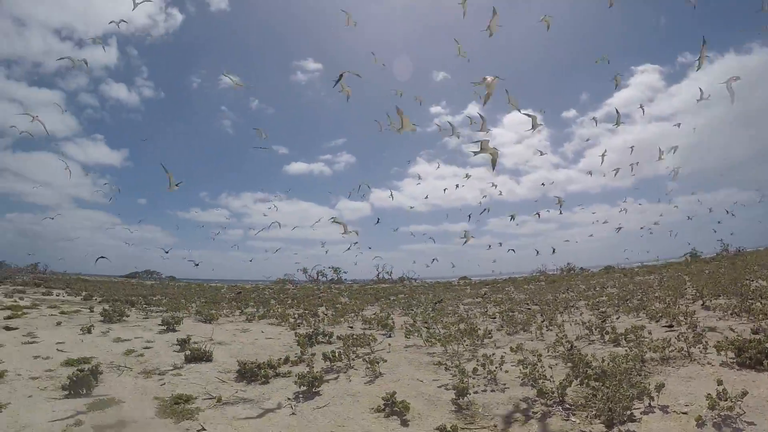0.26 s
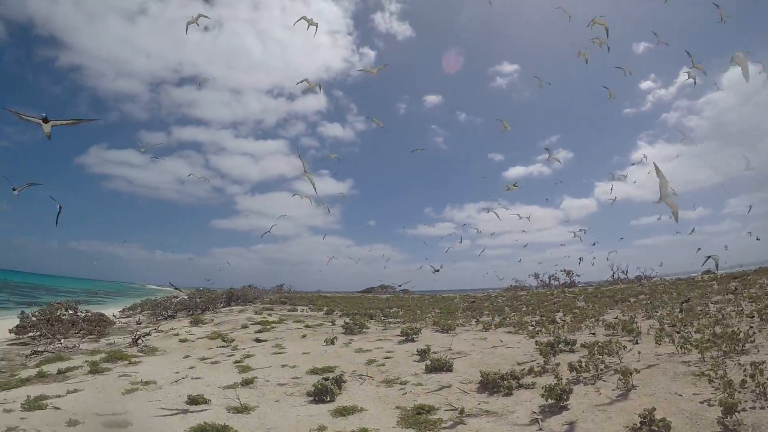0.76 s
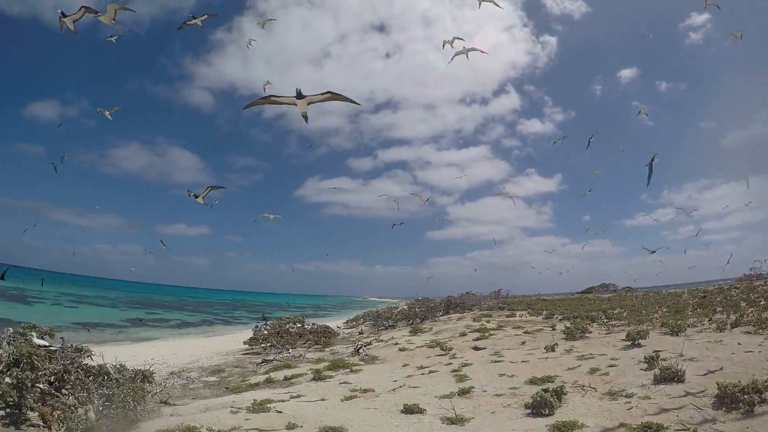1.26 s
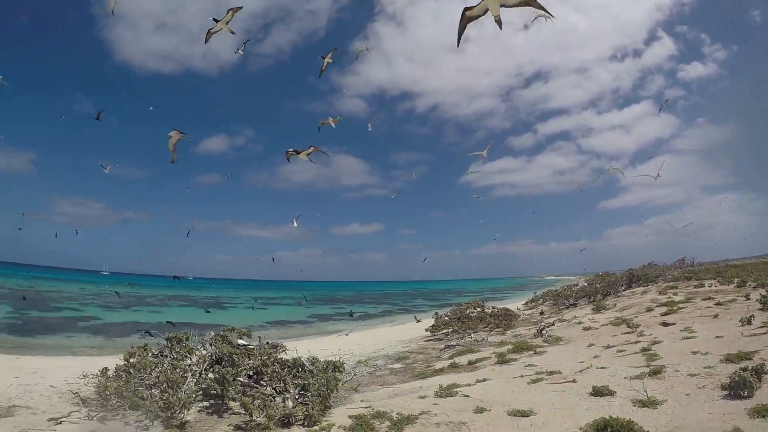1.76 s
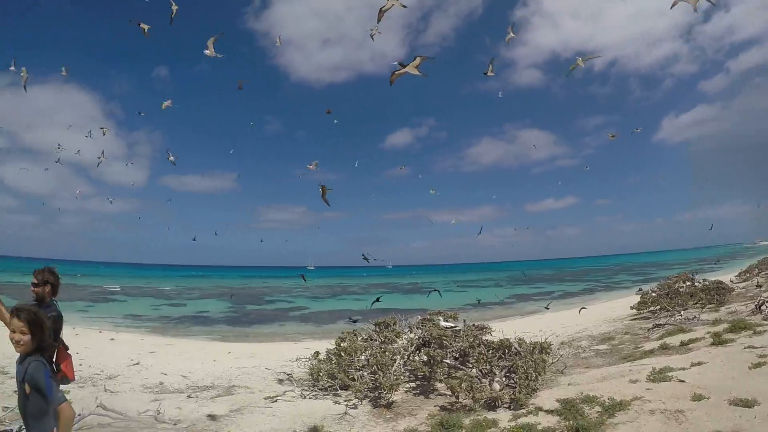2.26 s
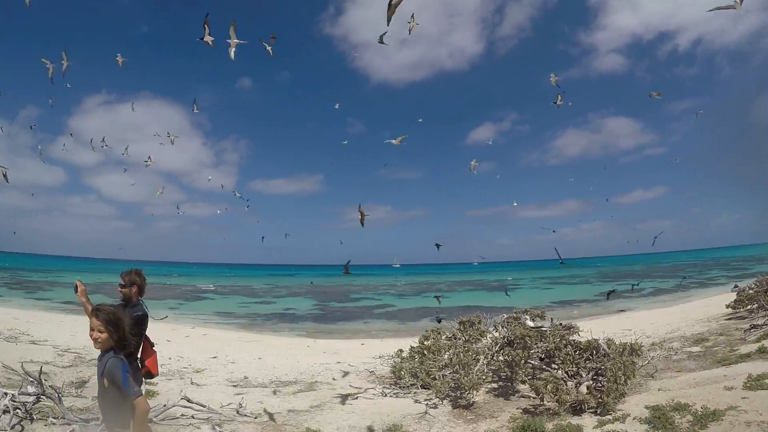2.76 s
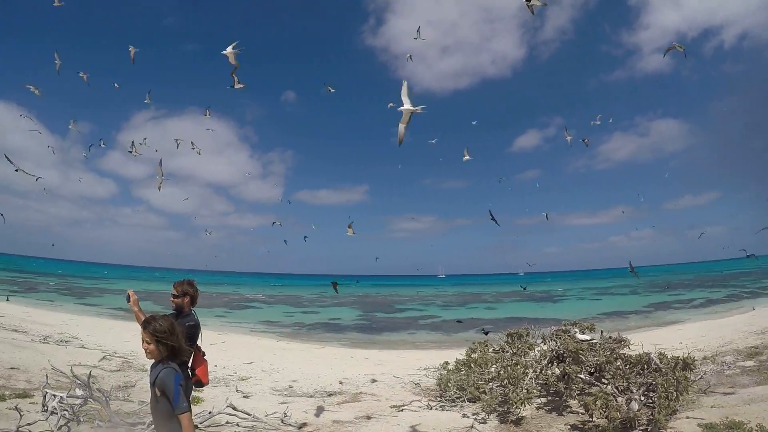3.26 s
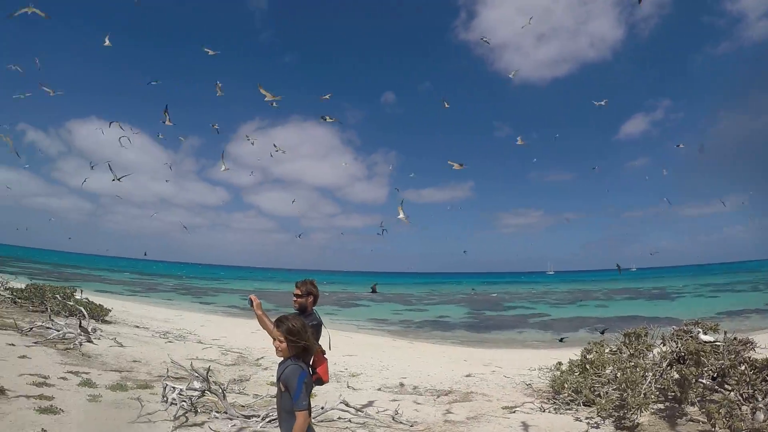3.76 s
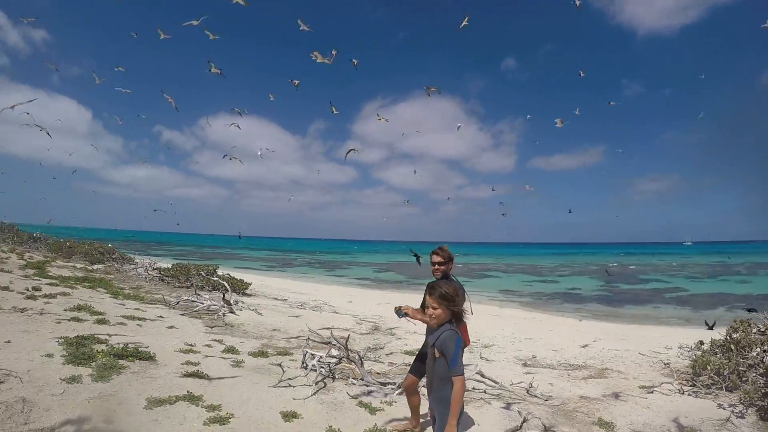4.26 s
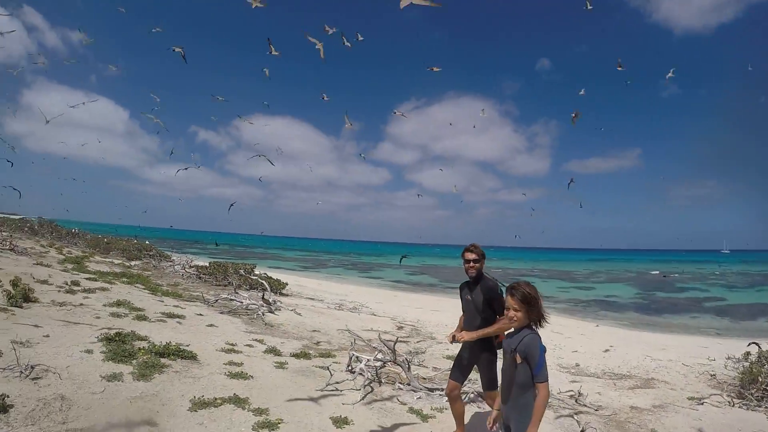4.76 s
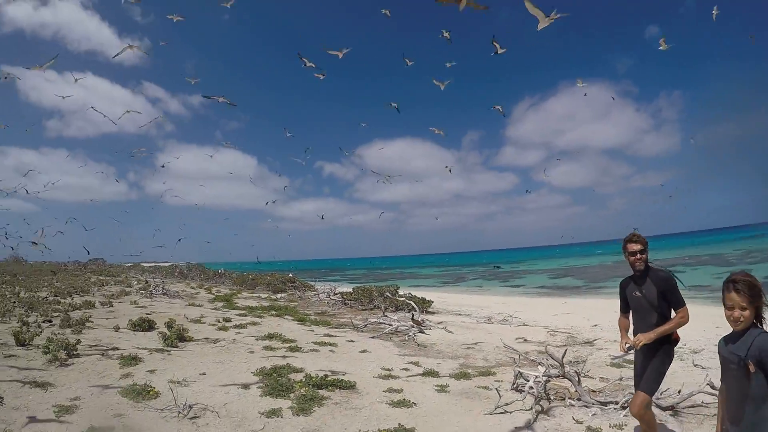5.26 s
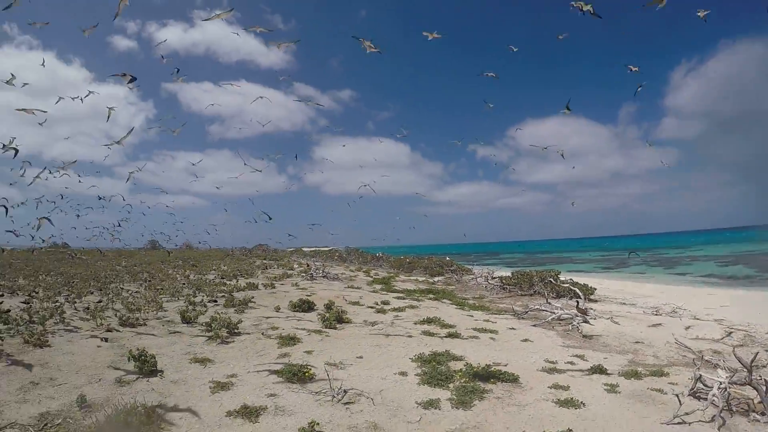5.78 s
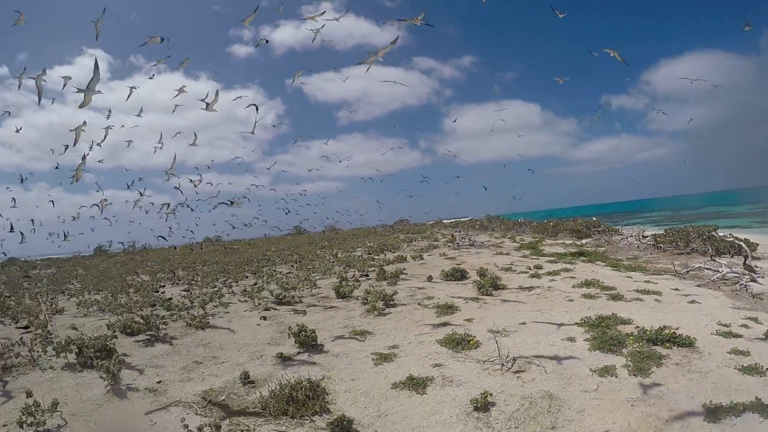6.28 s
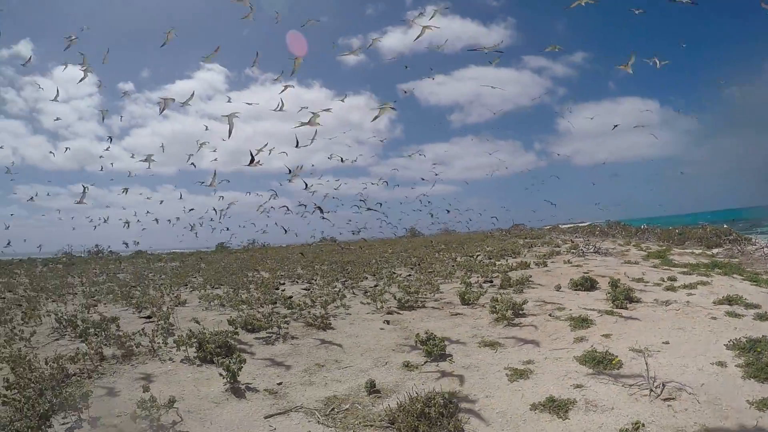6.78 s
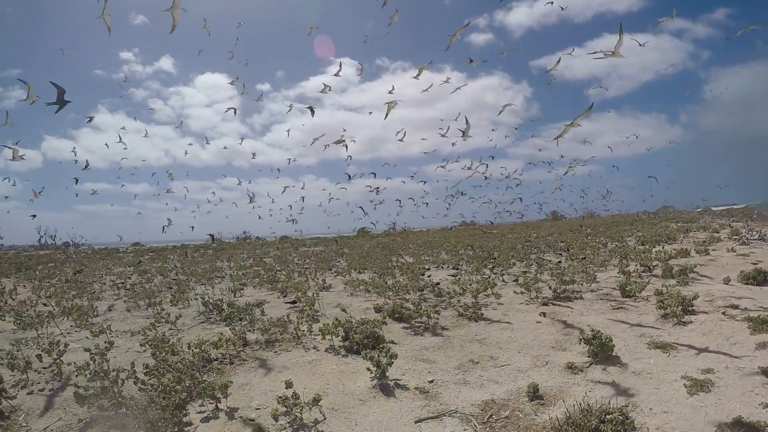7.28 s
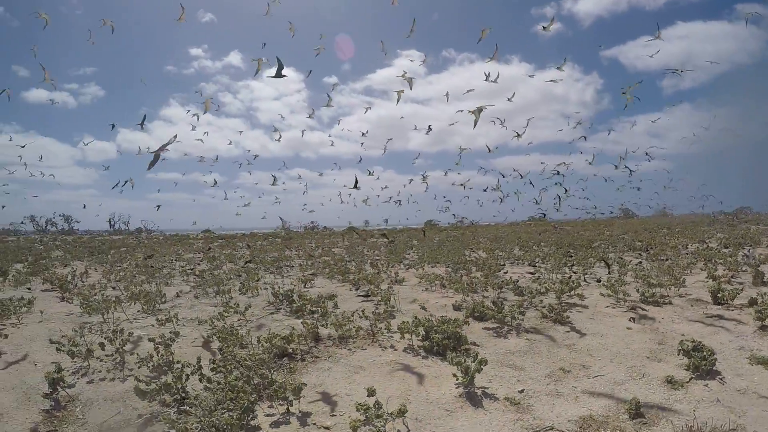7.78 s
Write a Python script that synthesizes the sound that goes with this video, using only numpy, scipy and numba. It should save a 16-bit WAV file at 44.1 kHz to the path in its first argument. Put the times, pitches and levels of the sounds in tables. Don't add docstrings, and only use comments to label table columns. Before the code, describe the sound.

Outdoors on an open beach, a large seabird colony calls without pause for about eight seconds. Hundreds of very short, shrill, warbling cries overlap into a dense wall, strongest around 2 to 3 kHz, slightly boxy from the microphone housing. Hard chips and brief squeals stand out from the start. Wind thumps at about 0.4-0.6 s and 1.3 s, and most heavily at 2.1-2.4 s, with low rumble and airy rush. Near 2.9 s quick bending calls cut through; from 3.4 to 4.3 s a busy cluster of chips and cries rises, followed by more bright calls at 4.4-4.8 s. Around 5.2-6.1 s come strong chips, hoarse rasps and pinched nasal cries. Thin whistling overhead calls crowd 6.4-6.8 s, then the chatter thins a little. Lighter gusts return after 7.3 s, with a last close cry near 7.95 s. Distant water hiss is barely audible.

```python
import sys
import numpy as np
from numba import njit
from scipy import signal
from scipy.fft import rfft, irfft, next_fast_len
from scipy.io import wavfile
from scipy.ndimage import uniform_filter1d

SR = 44100
rng = np.random.default_rng(int(sys.argv[2]) if len(sys.argv) > 2 else 0)


def wav_out(sig):
    wavfile.write(sys.argv[1], SR, np.round(np.clip(np.atleast_2d(sig).T, -1, 1) * 32767).astype(np.int16))


def gain_from_db(level_db):
    decades = np.asarray(level_db, float) / 20
    return 10 ** decades


N = 354078

# (frequency [Hz], level per Hz [dB])
COLOUR = [(880, -43), (1500, -26), (1670, -26.5), (1910, -2.5), (2250, -11), (2420, -3.5), (2500, 0),
          (2620, -3.5), (2840, -3.5), (3000, -14), (3720, -17), (5570, -21), (6140, -32), (6960, -26),
          (8350, -41.5), (15000, -39.5)]


def flock():
    band_edges_hz = [1450, 2250, 3200, 7800]
    out = np.zeros(N)
    for start, length, pitch, fall, rise, far in rng.random((1250, 6)):
        low_hz = 860 - 260 * pitch ** 1.7
        start_hz = low_hz * (.93 + .25 * fall)
        end_hz = low_hz * (.97 + .35 * rise ** 3)
        glide = bend(.022 + .055 * length, start_hz, low_hz, end_hz)
        level = gain_from_db(-3.6 * np.log(.08 + far))
        add(out, cry(glide, level, uneven_db=4, fade_s=.008), start * N / SR - .04)
    blur = rms_one(out) + gain_from_db(-8) * rng.standard_normal(N)
    edges = [*band_edges_hz, SR]
    bands = [coloured(blur, COLOUR, low, high) for low, high in zip(edges, edges[1:])]
    return sum(gain * evened(band, 0.077) for gain, band in zip(flock_levels(), bands))


def flock_levels():
    # (time [s], loudness [dB], nearness as shrill part [dB])
    flock_course = [(0, -34, -3.5), (.6, -37.5, -6.5), (1.29, -31, -12.5), (1.52, -31, -11.5),
                    (1.7, -38, -12), (1.97, -29.5, -13.5), (2.55, -38.5, -9), (2.84, -33, -11.5),
                    (3.2, -38.5, -3.5), (3.8, -30.5, -13), (4.5, -32, -12.5), (4.96, -34.5, -10),
                    (5.15, -32.5, -13.5), (5.5, -38.5, -1), (5.95, -38, -8), (6.45, -30.5, -6.5),
                    (6.9, -36.5, -4.5), (8.03, -34, -7)]
    # (time [s], loudness [dB])
    low_voices = [(0.0, -39), (0.62, -32.5), (0.76, -41.5), (1.85, -50), (3.29, -34.5), (3.82, -47.5),
                  (3.87, -30), (3.91, -39), (4.18, -30.5), (4.25, -41.5), (5.41, -37), (5.57, -29.5),
                  (5.79, -31.5), (5.95, -28.5), (5.99, -43), (6.42, -40), (7.98, -37), (8.03, -40)]
    loud_db, near_db = in_time(flock_course)
    low_db, = in_time(low_voices)
    shrill_db = loud_db + near_db
    top_db = loud_db - 31 + 0.41 * near_db
    return gain_from_db(np.array([low_db, loud_db, shrill_db, top_db]) - 1)


def cry(pitch_hz, level, uneven_db, fade_s):
    start = 2 * np.pi * rng.random(16)
    swell = gain_from_db(uneven_db * rng.standard_normal((22, 16)))
    phase = 2 * np.pi * np.cumsum(pitch_hz) / SR
    stack = partials(phase, swell * np.cos(start), swell * np.sin(start), 800)
    ramp = np.arange(len(pitch_hz)) / SR / fade_s
    fade = np.minimum(1, np.minimum(ramp, ramp[::-1]))
    return stack * level * np.sqrt(4 * pitch_hz / SR) * fade


@njit(fastmath=True)
def partials(phase, sines, cosines, step):
    out = np.zeros(len(phase))
    for i in range(len(phase)):
        knot, part = i // step, i % step / step
        c1, s1 = np.cos(phase[i]), np.sin(phase[i])
        c, s, here, ahead = c1, s1, 0., 0.
        for k in range(sines.shape[1]):
            c, s = c * c1 - s * s1, s * c1 + c * s1
            here += sines[knot, k] * s + cosines[knot, k] * c
            ahead += sines[knot + 1, k] * s + cosines[knot + 1, k] * c
        out[i] = here + part * (ahead - here)
    return out


def bend(length_s, start_hz, mid_hz, end_hz):
    v = np.linspace(0, 1, int(length_s * SR))
    start_part = 2 * (v - .5) * (v - 1) * start_hz
    mid_part = 4 * v * (1 - v) * mid_hz
    end_part = 2 * v * (v - .5) * end_hz
    return start_part + mid_part + end_part


def syllables_of(dips, arches):
    rows = [(s, length, a, (a + b) / 2 * (1 - 0.05), b, db) for s, length, a, b, db in dips]
    rows += [(s, length, a, (a + b) / 2 + 0.0928 * abs(b - a), b, db) for s, length, a, b, db in arches]
    return sorted(rows)


def near_birds(syllables):
    out, phrases, end = np.zeros(N), [], -1
    for s, length, *pitches_hz, level_db in syllables:
        if abs(s - end) > .006:
            phrases.append((s, [], []))
        phrases[-1][1].append(bend(length, *pitches_hz))
        phrases[-1][2].append(np.full(int(length * SR), level_db))
        end = s + length
    tremble, flutter = drift(90), drift(70)
    for s, bends, levels in phrases:
        pitch_hz, level_db = [uniform_filter1d(np.concatenate(c), size=300) for c in (bends, levels)]
        pitch_hz = pitch_hz * (1 + .009 * tremble[int(s * SR):][:len(pitch_hz)])
        add(out, cry(pitch_hz, gain_from_db(level_db), uneven_db=1.8, fade_s=.007), s)
    return out * gain_from_db(1.1 * flutter + 3.2 * drift(380))


def passing_birds():
    # (time [s], length [s], start [Hz], end [Hz], level [dB])
    passing_dips = [(.11, 0.077, 700, 730, -37.5), (1.23, 0.072, 895, 864, -39),
                    (2.03, 0.013, 724, 686, -58), (3.32, .045, 659, 718, -38),
                    (3.585, .075, 670, 1030, -33), (3.66, .044, 1035, 788, -29.5),
                    (3.704, .064, 786, 1140, -30.5), (3.8, .045, 936, 830, -30.5),
                    (3.89, .05, 1010, 830, -32), (3.94, 0.02, 819, 1087, -36), (3.995, .035, 806, 988, -34),
                    (4.94, 0.017, 676, 694, -35), (6.22, 0.04, 772, 970, -48), (6.46, 0.055, 813, 832, -35),
                    (7.47, 0.029, 803, 807, -36)]
    passing_arches = [ (1.14, .035, 857, 873, -39), (3.845, .045, 818, 997, -35.5),
                      (1.4, 0.069, 852, 780, -43), (1.571, 0.016, 840, 940, -37),
                      (1.91, .053, 632, 688, -45), (3.775, 0.023, 798.4, 1008, -42),
                      (4.13, .04, 880, 830, -40), (4.17, .05, 823, 893, -41), (3.959, .076, 548, 672, -37),
                      (4.27, .069, 955, 950, -52.5), (4.84, .055, 850, 828, -35),
                      (4.895, .075, 828, 886, -35), (7.72, 0.04, 891, 894, -38),
                      (7.97, .055, 558, 760, -36.5)]
    # (frequency [Hz], level [dB])
    side_on = [(1800, -7), (2500, 0), (2950, 11), (3400, 9), (4200, -6), (5600, 1), (6800, -7), (8800, -6),
               (11000, -10), (14000, -20)]
    return coloured(near_birds(syllables_of(passing_dips, passing_arches)), COLOUR, change=side_on)


def facing_birds():
    # (time [s], length [s], start [Hz], end [Hz], level [dB])
    facing_dips = [(.56, .05, 723, 807, -34), (.61, .04, 1005, 1165, -33), (.67, .045, 830, 693, -36),
                   (4.525, .045, 827, 765, -33), (4.65, .08, 850, 820, -32), (.915, .045, 810, 675, -38),
                   (1.005, .06, 705, 1000, -37), (6.73, .06, 870, 1080, -33), (.22, .025, 780, 725, -34),
                   (.31, .05, 715, 715, -35), (5.25, .045, 740, 740, -35), (5.41, .04, 760, 790, -36)]
    facing_arches = [(1.87, .05, 830, 1015, -43.5), (4.415, .11, 609, 811, -35), (4.57, .08, 731, 854, -34),
                     (6.57, .057, 896, 960, -40.5), (7.95, .054, 1000, 950, -30.5),
                     (2.905, .027, 1020, 880, -32), (2.932, .035, 880, 985, -32),
                     (2.967, .025, 985, 820, -33), (2.992, .03, 820, 790, -36), (.96, .045, 675, 705, -37),
                     (2.82, .06, 800, 1040, -37), (4.73, .014, 830, 980, -36), (4.744, .014, 980, 800, -36),
                     (4.758, .014, 800, 940, -38), (3.04, .035, 880, 940, -39), (.065, .06, 850, 865, -33),
                     (1.085, .03, 850, 810, -38), (6.733, .05, 715, 840, -39), (7.1, .035, 800, 950, -35),
                     (7.145, .035, 900, 865, -37), (.245, .06, 725, 810, -34), (5.205, .045, 720, 735, -38),
                     (5.295, .04, 735, 840, -35), (5.45, .035, 790, 980, -36), (5.85, .06, 735, 820, -39),
                     (5.915, .04, 720, 790, -39), (5.74, .04, 830, 960, -39)]
    # (frequency [Hz], level [dB])
    towards = [(1800, -9), (2500, -2), (2950, 6), (3500, -1), (4100, 1), (4800, 0), (5600, 7), (6600, -2),
               (8000, 1), (9500, 2), (11500, -9), (14000, -20)]
    return coloured(near_birds(syllables_of(facing_dips, facing_arches)), COLOUR, change=towards)


def overhead_birds():
    # (time [s], length [s], start [Hz], end [Hz], level [dB])
    overhead_dips = [
        (6.46, 0.041, 794, 760, -27),
        (6.545, 0.021, 787, 800, -30),
        (6.69, 0.089, 724, 810, -31),
        (7.08, 0.04, 790, 945, -39),
        (7.3, .04, 810, 810, -37),
        (7.45, 0.05, 780, 890, -32),
    ]
    overhead_arches = [
        (3.79, 0.025, 905, 980, -27),
        (6.41, 0.041, 730, 786, -31),
        (6.5, .03, 760, 960, -26),
        (6.575, 0.055, 920, 986, -27.5),
        (6.625, 0.028, 920, 712, -24),
        (7.26, 0.03, 795, 915, -37),
    ]
    # (time [s], length [s], pulse rate [1/s], level [dB])
    ticks = [
        (2.274, .006, 300, -34),
        (3.856, 0.012, 300, -34),
        (7.451, .008, 300, -31),
        (7.529, .008, 300, -32),
    ]
    # (frequency [Hz], level [dB])
    whistle = [(8500, -40), (10000, -7), (11800, -2), (13000, -10), (14500, -30)]
    calls = near_birds(syllables_of(overhead_dips, overhead_arches))
    return coloured(calls + scolds(ticks), COLOUR, change=whistle)


def pinched_birds():
    # (time [s], length [s], start [Hz], end [Hz], level [dB])
    pinched = [
        (3.13, .025, 850, 760, -34),
        (5.65, .04, 800, 790, -38),
        (5.72, .03, 810, 785, -35),
        (5.75, .035, 785, 550, -36),
        (5.875, .045, 785, 760, -35),
        (5.92, .053, 760, 810, -34),
        (5.973, .02, 810, 650, -35),
        (6.785, .04, 830, 870, -37),
        (6.825, .085, 842, 865, -34),
    ]
    # (frequency [Hz], level [dB])
    nasal = [(2600, -9), (3200, -6), (4100, 8), (5200, 1), (7000, -2), (8700, -6), (12000, -30)]
    return coloured(near_birds(syllables_of([], pinched)), COLOUR, change=nasal)


def chips():
    # (time [s], peak level [dB], third partial [Hz])
    chip_calls = [(0.111, -12, 2670), (0.2176, -16, 2630), (0.63, -27, 2550), (0.9475, -34, 2690),
                  (1.0306, -26, 2590), (1.1488, -21, 2620), (1.3235, -16, 2450), (1.615, -18, 2535),
                  (1.7404, -16, 2490), (2.0236, -24, 2500), (2.277, -15, 2750), (2.9177, -22, 2740),
                  (3.4182, -15, 2545), (3.5015, -25, 2580), (3.5877, -29, 3050), (3.666, -22, 2730),
                  (3.7294, -14, 2520), (3.8018, -16, 2670), (3.8561, -10, 2620), (3.9423, -22, 2800),
                  (3.991, -20.5, 2510), (4.079, -14.5, 2780), (4.1734, -26.5, 2470), (4.2683, -20.5, 2780),
                  (4.3884, -31, 2540), (4.5263, -10, 2390), (4.5986, -16, 2580), (4.783, -21, 2450),
                  (5.1324, -16, 2510), (5.1866, -11, 2520), (5.2435, -16, 2580), (5.5044, -28, 2550),
                  (5.6506, -29, 2590), (5.8008, -16, 2580), (5.905, -15, 2420), (5.9864, -13, 2590),
                  (6.087, -13, 2426), (6.2958, -28, 2600), (6.3594, -30, 2600), (6.4757, -20, 2970),
                  (6.55, -28, 2460), (6.8136, -33, 2570), (7.4923, -27, 2380), (7.728, -16, 2540),
                  (7.9054, -23, 2426)]
    # (frequency [Hz], level [dB])
    chippy = [(1900, -14), (2300, 0), (2900, 0), (3400, -8), (6000, -9), (9000, -14)]
    length_s, decay_60db_s = .045, 0.13
    out, age = np.zeros(N), np.arange(int(length_s * SR)) / SR
    for (s, peak_db, hz), slide in zip(chip_calls, rng.standard_normal(len(chip_calls))):
        pitch_hz = hz / 3 * (1 + 0.037 * slide * age / length_s)
        level = gain_from_db(peak_db - 11 - 60 * age / decay_60db_s)
        add(out, cry(pitch_hz, level, uneven_db=2.0, fade_s=0.0025), s - .002)
    return coloured(out, COLOUR, change=chippy)


def scolds(rows):
    out = np.zeros(N)
    for s, length, per_s, level_db in rows:
        chance, breath = rng.standard_normal((2, SR // 5))[:, :int(length * SR)]
        rate = per_s * gain_from_db(40.0 * uniform_filter1d(chance, size=150))
        beat = np.cumsum(rate) / SR % 1
        pulses = rms_one(breath * np.exp(-2 * beat))
        fade = np.minimum(np.arange(len(beat)) / 170, np.linspace(2, 0, len(beat))).clip(0, 1)
        add(out, gain_from_db(level_db) * pulses * fade, s)
    return out


def rasps():
    # (time [s], length [s], pulse rate [1/s], level [dB])
    hoarse_scolds = [(5.202, 0.028, 600, -26.5), (5.531, 0.091, 330, -24.5), (5.635, 0.064, 56, -25),
                     (5.846, 0.029, 370, -31.5), (2.402, 0.11, 420, -38), (2.758, 0.054, 130, -34),
                     (5.499, 0.033, 370, -31), (1.621, 0.013, 500, -52), (1.897, 0.014, 200, -36),
                     (5.988, 0.007, 83, -33), (6.089, 0.011, 87, -37.5)]
    # (time [s], length [s], pulse rate [1/s], level [dB])
    snaps = [
        (1.617, .014, 300, -39),
        (1.655, .012, 300, -41),
        (1.74, .008, 300, -42),
        (3.803, .014, 300, -36),
        (4.72, .05, 250, -35),
        (6.815, .022, 300, -30),
        (7.493, .012, 300, -37),
    ]
    # (frequency [Hz], level [dB])
    hoarse = [(1400, 3), (2000, 3), (3000, 0), (5000, -3), (8000, -8), (10000, -22)]
    snappy = [(1800, 0), (5000, 0), (8000, 8), (11000, -3), (14000, -6)]
    rough = coloured(scolds(hoarse_scolds), COLOUR, change=hoarse)
    return rough + coloured(scolds(snaps), COLOUR, change=snappy)


def mellow_birds():
    # (time [s], length [s], start [Hz], end [Hz], level [dB])
    mellow = [
        (1.456, 0.079, 784, 813, -39),
        (1.646, 0.062, 763, 804, -41),
        (1.81, .09, 740, 730, -44.5),
        (7.168, .06, 820, 810, -51),
        (7.35, 0.057, 740, 690, -42),
    ]
    # (frequency [Hz], level [dB])
    dull = [(1200, 10), (1600, 8), (1850, -30), (3000, -50)]
    return coloured(near_birds(syllables_of([], mellow)), COLOUR, change=dull)


def wind():
    # (frequency [Hz], level per Hz [dB])
    thump_colour = [(7.1, -33), (12, 5), (27, -1), (43, 0), (114, -9.5), (156, -20.5), (200, -25.5),
                    (260, -29), (440, -120)]
    rush_colour = [(76, -42), (130, -8.5), (206, -8.5), (767, -13), (1310, -18), (1680, -22.5), (1910, -5),
                   (2200, -15), (2860, -42.5), (4840, -120)]
    thump_gain, rumble_gain, rush_gain = wind_gains()
    white, lumps = rng.standard_normal((3, N)), drift(14.)
    thump = coloured(white[0], thump_colour, high_hz=56.4)
    rumble = coloured(white[1], thump_colour, low_hz=60.2) * gain_from_db(4.0 * lumps)
    rush = coloured(white[2], rush_colour) * gain_from_db(2.13 * lumps + 1.26 * drift(45.))
    return evened(thump, .14) * thump_gain + evened(rumble, 0.14) * rumble_gain + evened(rush, 0.27) * rush_gain


def wind_gains():
    # (time [s], rush level [dB])
    breeze = [(0, -44), (.33, -49), (.9, -45), (1.2, -55), (1.4, -49), (1.5, -55), (1.62, -62.5),
              (2.0, -51), (2.1, -48), (2.6, -45.5), (3.55, -51), (3.85, -48.5), (4.2, -42), (5.0, -45.5),
              (5.8, -43.5), (6.5, -49), (7.45, -51.5), (7.75, -44.5)]
    # (time [s], length [s], thump level [dB], rush level [dB])
    gusts = [(0.056, 0.15, -37, -44), (0.438, 0.22, -21, -46), (0.55, 0.13, -23.5, -51),
             (0.64, 0.19, -24.5, -59), (1.004, 0.26, -28.5, -45.5), (1.244, 0.33, -34, -38.5),
             (1.335, 0.2, -19, -39), (1.67, 0.071, -26.5, -57), (1.743, 0.15, -33, -49.5),
             (2.12, 0.17, -18, -41), (2.189, 0.04, -13, -40.5), (2.244, 0.072, -21, -35),
             (2.308, 0.11, -15, -35.5), (2.395, 0.31, -24, -43), (2.877, 0.36, -31, -63),
             (3.285, 0.62, -34, -45), (4.003, 0.35, -27.5, -47), (4.126, 0.13, -33, -43),
             (4.62, 0.072, -31, -56), (4.835, 0.12, -47, -46), (5.07, 0.062, -46, -46),
             (5.212, 0.092, -46, -41), (5.595, 0.11, -40, -45), (5.99, 0.23, -32, -55),
             (6.324, 0.13, -38, -41.5), (7.35, 0.15, -30.5, -49.5), (7.629, 0.11, -26, -41.5),
             (7.846, 0.064, -28, -46), (7.959, 0.12, -28.5, -48)]
    rush_db, = in_time(breeze)
    thump_db = -33 + .1 * (rush_db + 44)
    rumble_db = -39.5 + 0.54 * (rush_db + 48)
    powers = gain_from_db([thump_db, rumble_db, rush_db]) ** 2
    for s, length, low_db, high_db in gusts:
        middle_db = low_db + 0.45 * (high_db - low_db) + 2.5
        swell = np.cos(np.pi * ((np.arange(N) / SR - s) / length).clip(-.5, .5)) ** 2
        powers = powers + np.outer(gain_from_db([low_db, middle_db, high_db]) ** 2, swell)
    return np.sqrt(powers)


def surf():
    # (frequency [Hz], level per Hz [dB])
    surf_hiss = [(5000, -39), (8000, 11), (15000, 0)]
    return gain_from_db(-75) * coloured(rng.standard_normal(N), surf_hiss)


def coloured(x, points, low_hz=10, high_hz=SR, change=((1, 0), (2, 0))):
    size = next_fast_len(N + SR // 4)
    hz = np.arange(1, size // 2 + 2) * SR / size
    edges = 1 / np.sqrt((1 + (low_hz / hz) ** 16) * (1 + (hz / high_hz) ** 16))
    response = rms_one(gain_from_db(along(points, hz))) * gain_from_db(along(change, hz)) * edges
    return irfft(rfft(x, size) * response, size)[:N]


def along(points, hz):
    points = np.array(points)
    return np.interp(np.log(hz), np.log(points[:, 0]), points[:, 1])


def evened(x, span_s):
    return x / np.sqrt(uniform_filter1d(x ** 2, int(span_s * SR)) + 1e-20)


def rms_one(x):
    return x / np.sqrt(np.mean(x ** 2) + 1e-20)


def drift(rate, size=N):
    knots = rng.standard_normal(int(N / SR * 400))
    path = np.interp(np.arange(size) / SR * rate, np.arange(len(knots)), knots)
    return uniform_filter1d(path, 1 + int(SR / rate / 2))


def in_time(rows):
    s, *columns = np.transpose(rows)
    return [np.interp(np.arange(N) / SR, s, c) for c in columns]


def add(track, sound, s):
    at = max(int(s * SR), 0)
    track[at:at + len(sound)] += sound[:N - at]


def scene():
    colony = flock() + chips() + rasps() + mellow_birds()
    near = passing_birds() + facing_birds() + overhead_birds() + pinched_birds()
    return (colony + near + wind() + surf())[None]


def top_cut(x):
    return signal.sosfilt(signal.butter(12, 15200, fs=SR, output="sos"), x)


def record(dry):
    mix = 0.37 * np.tanh(dry / 0.45)
    return top_cut(mix)


dry = scene()
out = record(dry)
wav_out(out)
```